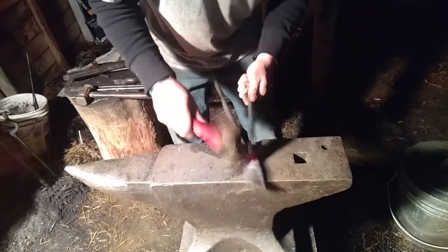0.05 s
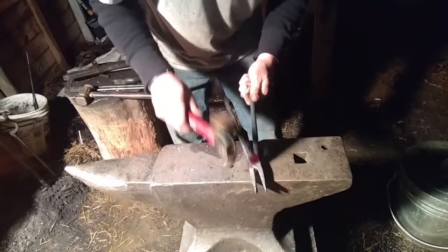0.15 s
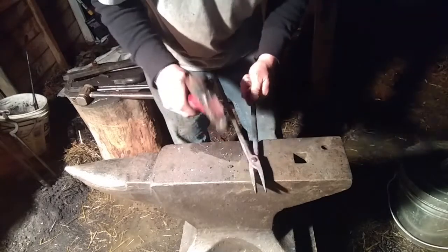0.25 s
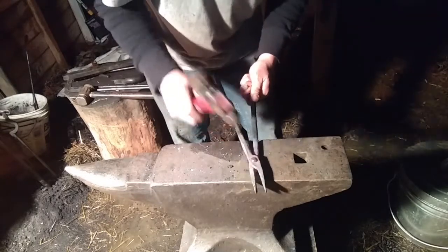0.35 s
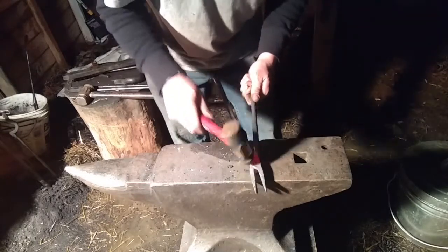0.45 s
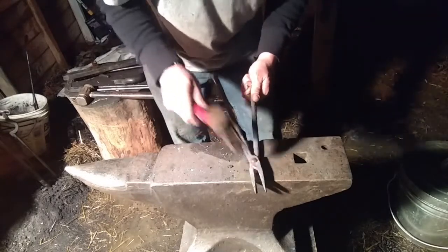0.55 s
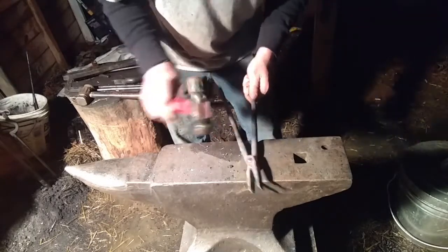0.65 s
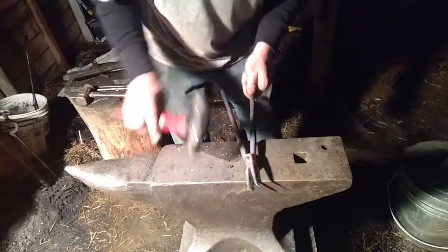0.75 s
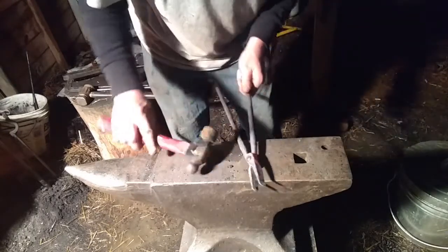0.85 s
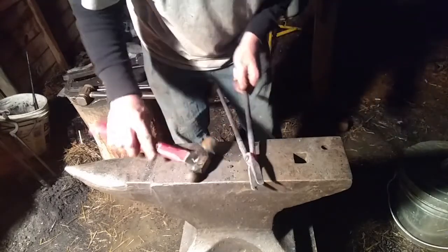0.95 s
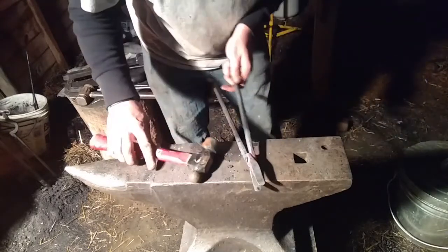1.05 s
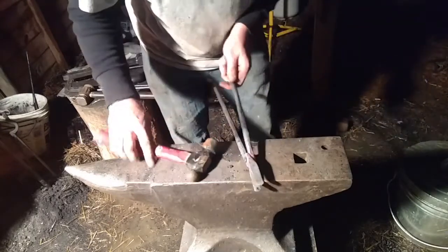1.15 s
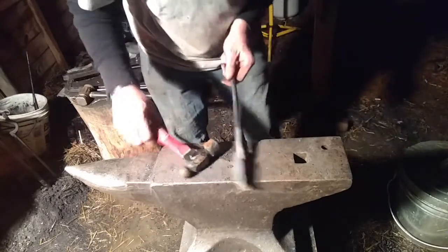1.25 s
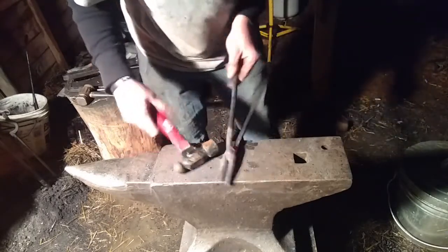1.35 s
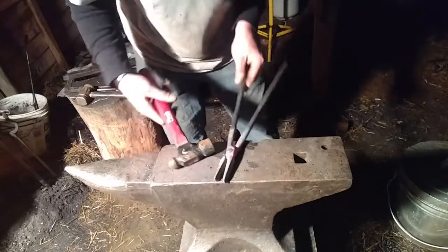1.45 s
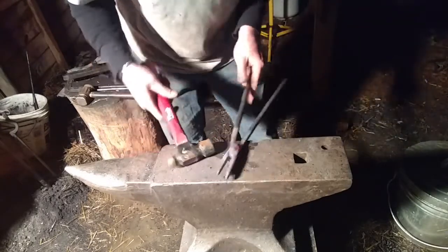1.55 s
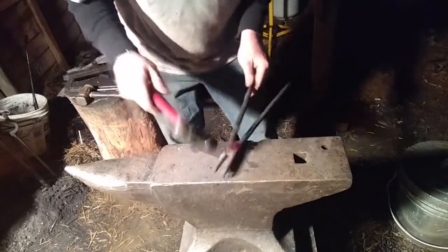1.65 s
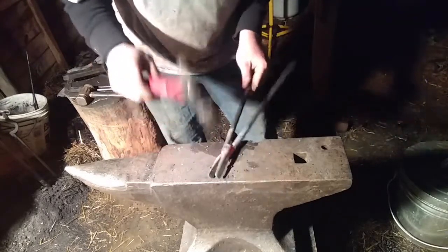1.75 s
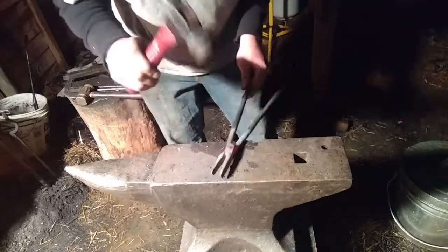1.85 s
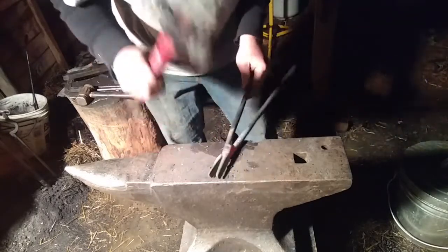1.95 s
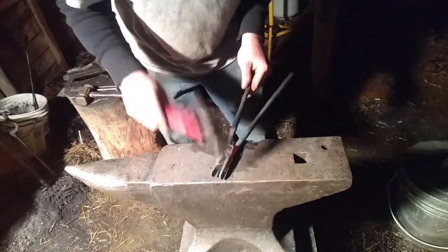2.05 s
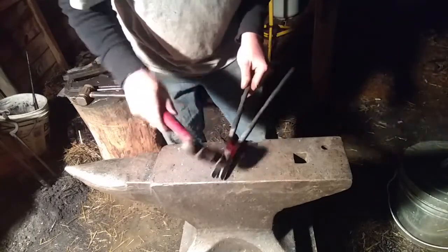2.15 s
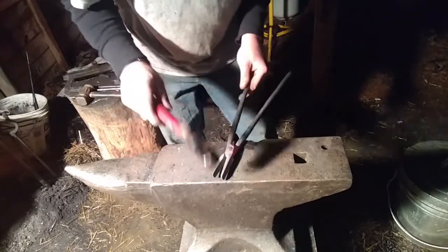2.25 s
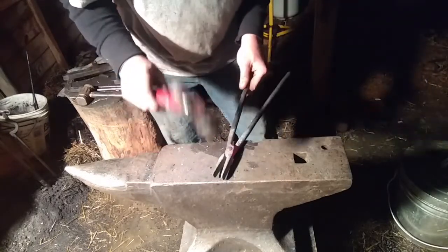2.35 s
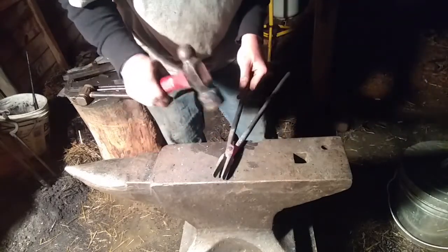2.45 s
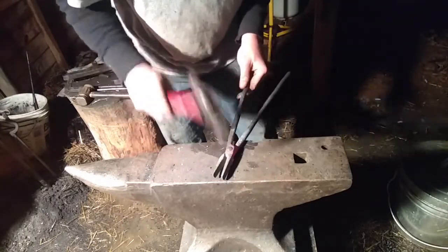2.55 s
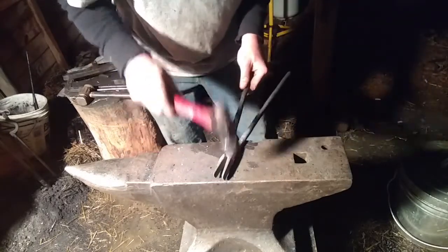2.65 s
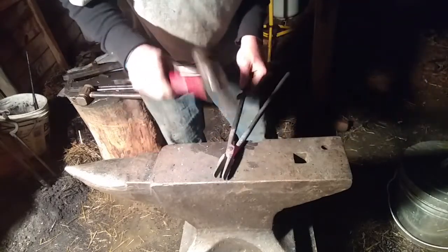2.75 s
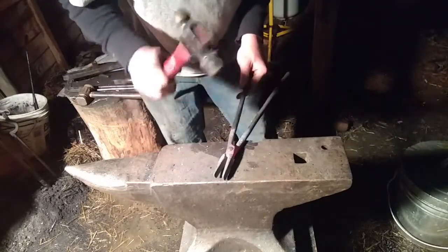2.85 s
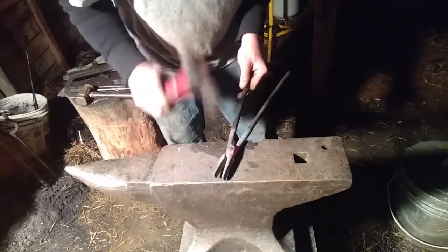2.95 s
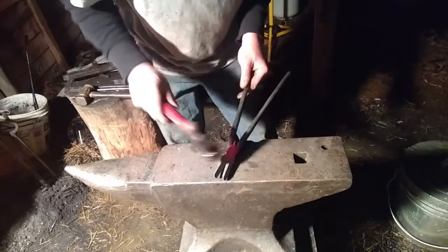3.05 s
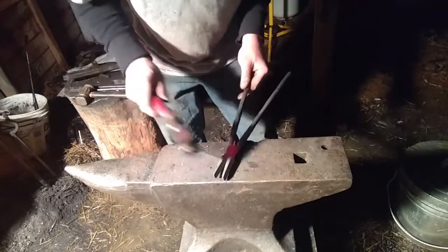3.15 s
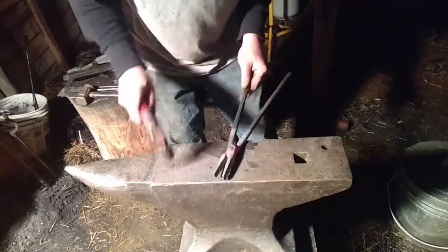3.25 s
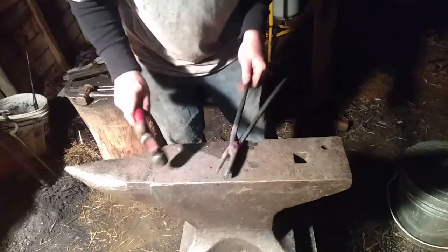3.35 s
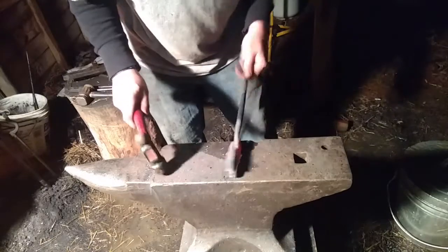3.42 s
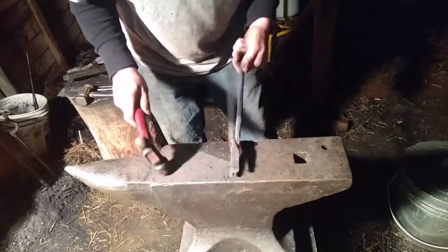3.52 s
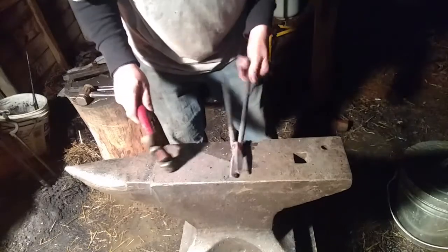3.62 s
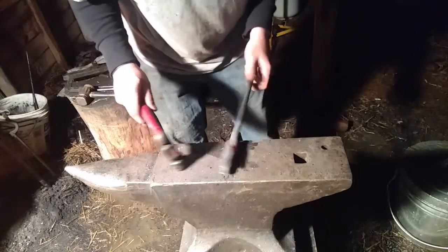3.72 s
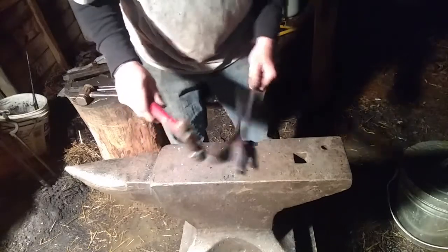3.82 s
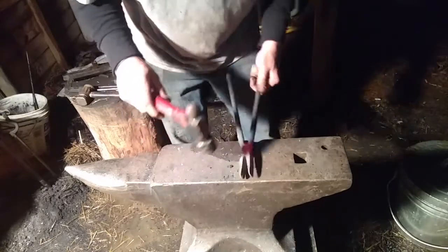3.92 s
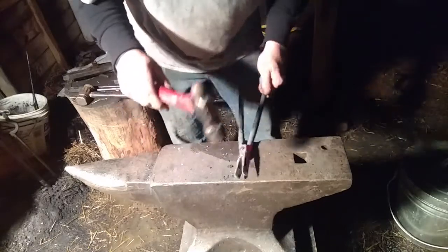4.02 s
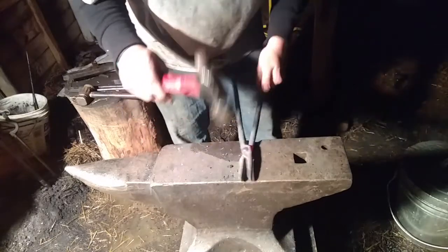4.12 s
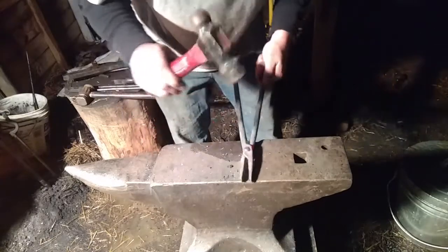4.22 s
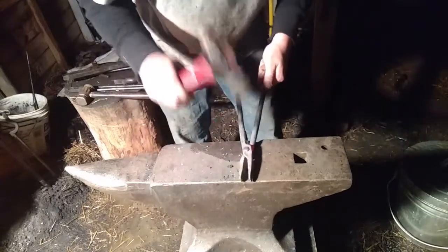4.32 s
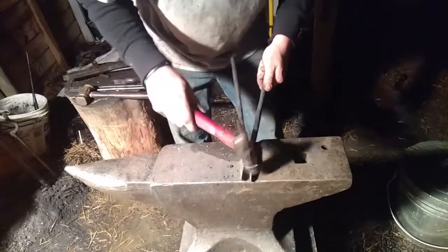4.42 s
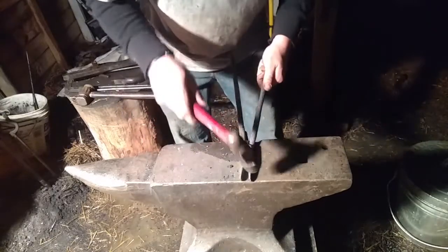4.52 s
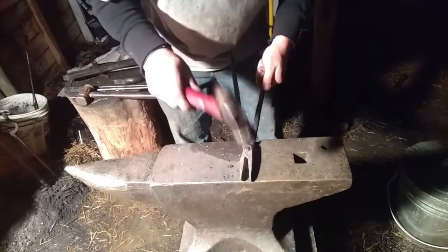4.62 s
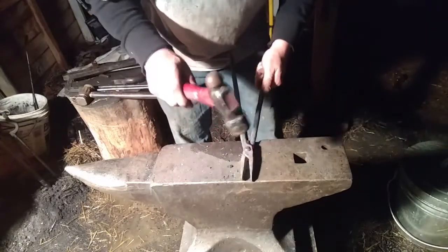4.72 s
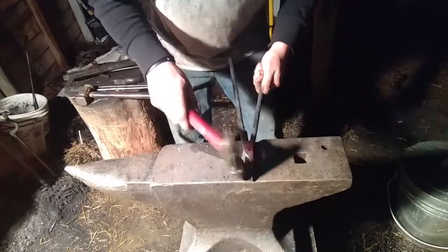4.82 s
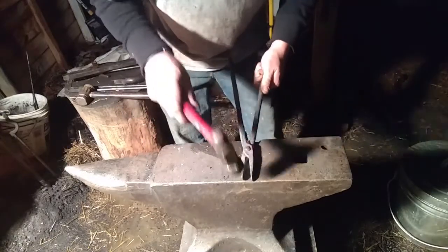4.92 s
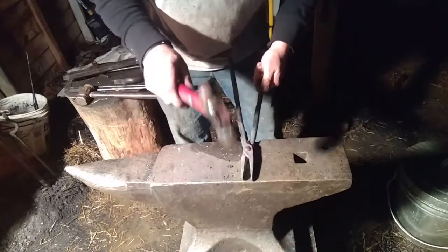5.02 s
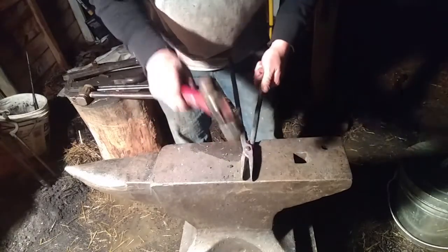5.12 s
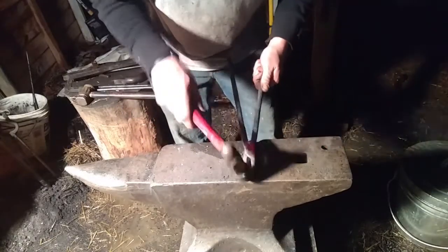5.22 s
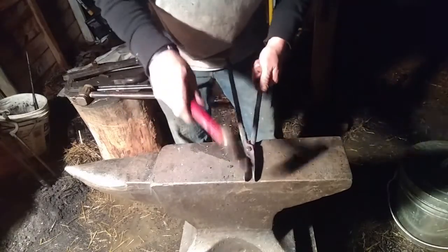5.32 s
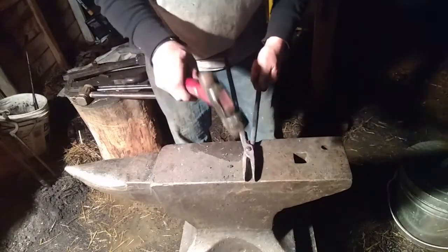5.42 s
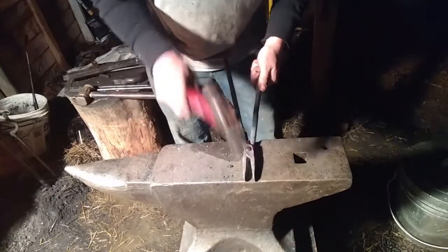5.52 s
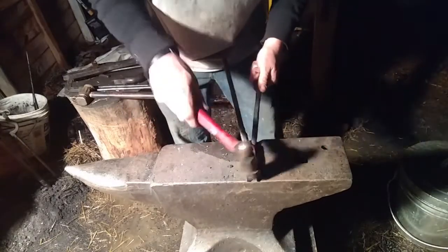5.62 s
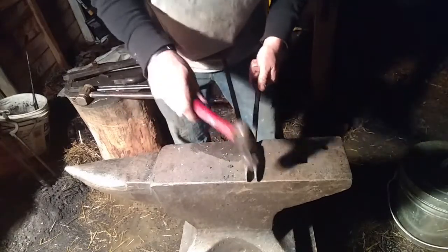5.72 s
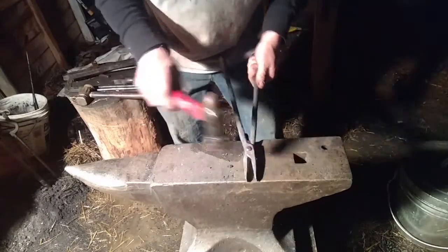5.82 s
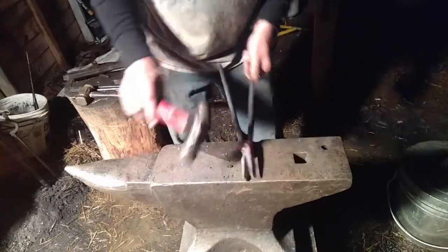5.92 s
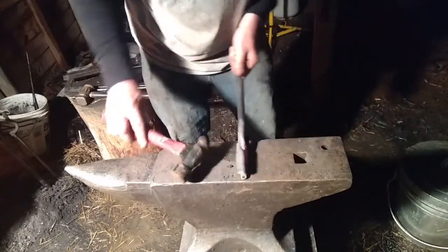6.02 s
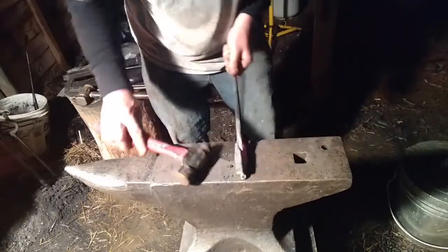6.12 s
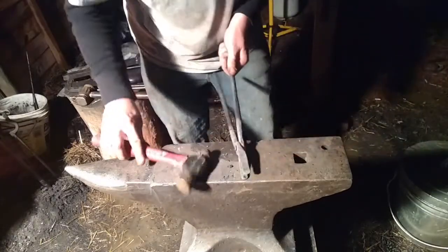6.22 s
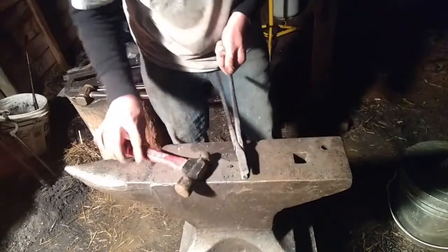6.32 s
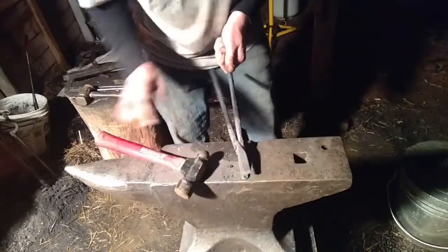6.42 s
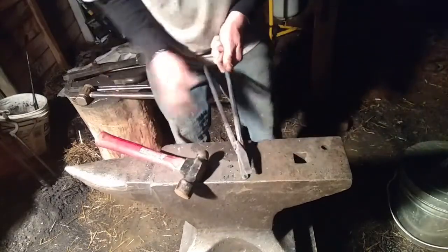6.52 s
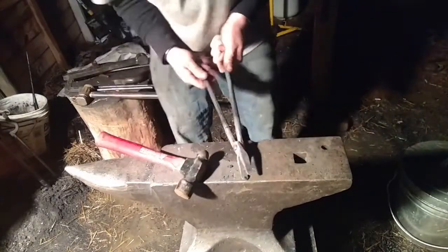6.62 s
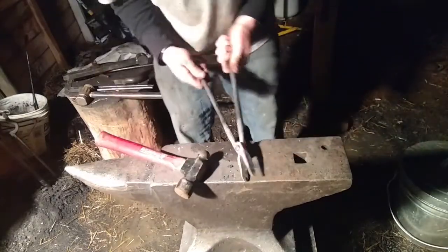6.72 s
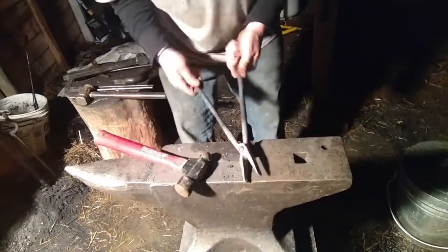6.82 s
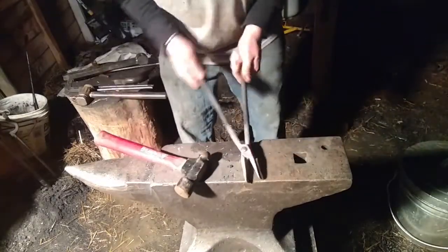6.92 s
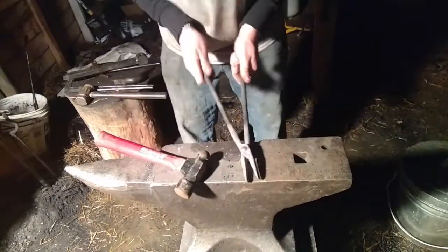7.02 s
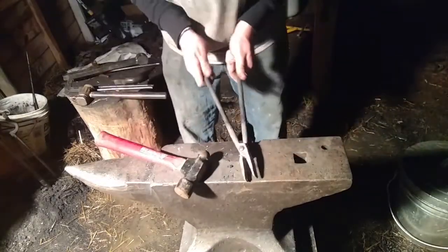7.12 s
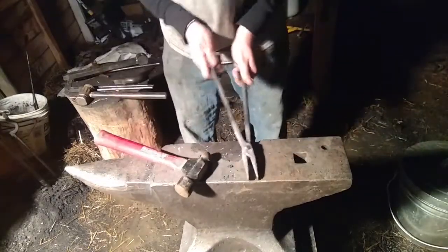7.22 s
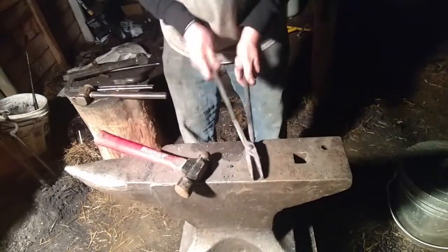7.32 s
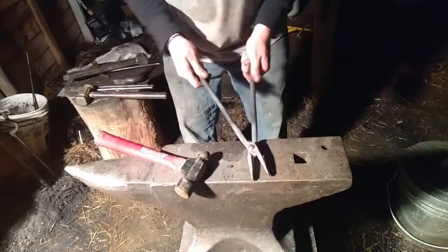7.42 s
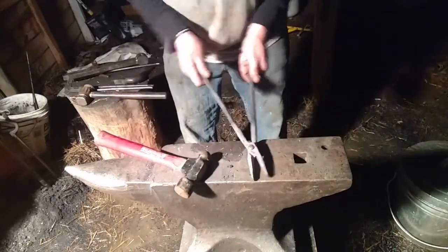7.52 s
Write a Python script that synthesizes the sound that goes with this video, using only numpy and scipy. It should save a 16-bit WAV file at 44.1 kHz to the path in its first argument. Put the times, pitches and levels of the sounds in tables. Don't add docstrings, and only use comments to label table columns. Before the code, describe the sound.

Sharp clanking blows on steel tongs over an anvil, with clattering hammer bounces and small metallic ticks, above a faint airy forge blower.

```python
import sys
import numpy as np
from scipy import signal
from scipy.fft import rfft, irfft, next_fast_len
from scipy.io import wavfile
from scipy.ndimage import uniform_filter1d

SR = 44100
rng = np.random.default_rng(int(sys.argv[2]) if len(sys.argv) > 2 else 0)


def how_loud(loudness_db):
    steps = np.asarray(loudness_db, float) / 20
    return 10 ** steps


def to_wav(sig):
    pcm = np.clip(np.atleast_2d(sig), -1, 1) * 32767
    pcm = np.round(pcm).astype(np.int16)
    wavfile.write(sys.argv[1], SR, pcm.T)


N = 333828


def unit(x):
    return x / np.sqrt(np.mean(x ** 2) + 1e-20)


def along(points, hz):
    f, v = np.transpose(points)
    return np.interp(np.log(hz + 1), np.log(f + 1), v)


def filtered(x, response):
    m = next_fast_len(x.shape[-1] + 1024)
    spectrum = rfft(x, m) * response(np.fft.rfftfreq(m, 1 / SR))
    return irfft(spectrum, m)[..., :x.shape[-1]]


def bump(hz, centre_hz, width_hz):
    return 1 / np.sqrt(1 + (2 * (hz - centre_hz) / width_hz) ** 2)


def ports(pair, alike):
    turn = np.arccos(np.clip(alike, -1, 1)) / 2
    shared, opposed = np.cos(turn) * pair[0], np.sin(turn) * pair[1]
    return np.array([shared + opposed, shared - opposed])


# [t/s, roar level just after/dB]
DUCKS = [(0, -49.5), (.08, -50), (.44, -50), (.82, -56), (2.1, -52.5), (2.61, -51.5), (3.04, -47.5),
         (3.32, -53.5), (4.45, -53), (4.85, -48.5), (5.2, -51.5), (5.58, -51), (6.018, -59)]
RECOVERY_DB_PER_S, DUCK_S = 9.5, 0.023


def automatic_gain_db():
    s, after_db = np.transpose(DUCKS)
    t = np.arange(N) / SR
    last = np.maximum(np.searchsorted(s, t, "right") - 1, 0)
    gain_db = after_db[last] + RECOVERY_DB_PER_S * (t - s[last])
    return uniform_filter1d(gain_db, int(DUCK_S * SR))


# [f/Hz, left minus right/dB]
LEFT_DB = [(60, 6), (180, -12.5), (550, -6.5), (1650, -4), (4970, -2.0), (15000, 3.5)]
# [f/Hz, likeness of the two ports]
ALIKE = [(60, 0.55), (300, 0.51), (1000, 0.56), (2600, 0.93), (15000, 0.96)]


def airflow(colour, patchy_db):
    hz, _, z = signal.stft(rng.standard_normal((2, N)), SR, nperseg=512)
    patches = uniform_filter1d(rng.standard_normal(z.shape[1:]), 5, 0)
    patches = uniform_filter1d(patches, 10, 1)
    z = ports(z, along(ALIKE, hz)[:, None]) * how_loud(patchy_db * unit(patches))
    pair = signal.istft(z, SR, nperseg=512)[1][:, :N]
    side = lambda f: how_loud([along(LEFT_DB, f) / 2, -along(LEFT_DB, f) / 2])
    return unit(filtered(pair, lambda f: colour(f) * side(f)))


def blade_tone(hz, wander_hz):
    drift = unit(uniform_filter1d(rng.standard_normal(N), SR // 30))
    phase = 2 * np.pi * np.cumsum(hz + wander_hz * drift) / SR
    return np.sqrt(2) * np.sin(phase) * how_loud([[-3.5], [1.5]])


# [f/Hz, density/dB per Hz]
ROAR = [(15, -68), (25, -13), (338, -6), (365, -0.5), (410, -15), (470, -6), (594, -5), (1060, -11),
        (1940, -14), (2270, -10.5), (2600, -56), (3380, -57.5), (5720, -120)]
# [f/Hz, density/dB per Hz]
HISS = [(1200, -52), (2500, -0.5), (3600, -7.5), (5400, -3.5), (7000, -5.5), (9000, -10.5), (11000, -17.5),
        (13000, -20.5), (15000, -23), (15600, -58)]
# [f/Hz, width/Hz, level over the roar/dB]
DUCT = [(390.5, 16, 9), (481.6, 2.8, 11), (768, 35, 11), (882, 24, 8), (936, 8.5, 7.5), (1098, 31, 11)]
# [f/Hz, wander/Hz, level against the roar/dB]
WHINE = [(2202, 4.86, -9.5), (2350, 28, -24), (3190, 38, -20), (4680, 45, -20)]
HISS_UNDER_DB = 9.5


def blower():
    roar_db = automatic_gain_db()
    hiss_db = roar_db - HISS_UNDER_DB + 3.5
    resonances = lambda f: 1 + sum((how_loud(db) - 1) * bump(f, c, w) ** 2 for c, w, db in DUCT)
    roar = airflow(lambda f: how_loud(along(ROAR, f)) * resonances(f), patchy_db=1.5)
    whine = sum(how_loud(db) * blade_tone(c, w) for c, w, db in WHINE)
    hiss = airflow(lambda f: how_loud(along(HISS, f)), patchy_db=3.0)
    return how_loud(roar_db) * (roar + whine) + how_loud(hiss_db) * hiss


def ring(modes, t, tilt_db=0, clang_hz=1, since_s=0):
    out = np.zeros(len(t))
    for hz, db, t60_s in modes:
        strength = how_loud(db + tilt_db * np.log2(hz / 3500) + rng.normal(0, 0.18))
        strength = strength * (1 + 0.6 * bump(hz, clang_hz, 270))
        decay = np.exp(-np.log(1000) * t / t60_s)
        out += strength * decay * np.sin(2 * np.pi * hz * (t + since_s))
    return out * (1 - np.exp(-t / 0.00019))


# [f/Hz, t60/s]
CLATTER_T60 = [(200, 0.48), (600, 0.061), (1500, 0.11), (4000, 0.13), (10000, .13), (15000, 0.049)]


def clatter(t, spectrum, body, tilt_db, clang_hz, grainy_db, alike, lasts, clang):
    hz, s, z = signal.stft(rng.standard_normal((2, len(t))), SR, nperseg=128)
    tilted_db = along(spectrum, hz) + tilt_db * np.log2(np.maximum(hz, 1500) / 3500)
    colour = how_loud(tilted_db) * (1 + clang * bump(hz, clang_hz, 830) ** 2)
    colour = colour / np.linalg.norm(colour)
    grains = how_loud(grainy_db * rng.standard_normal(len(s)))
    decay = how_loud(-60 * s / (lasts * along(CLATTER_T60, hz)[:, None]))
    noise = signal.istft(z * colour[:, None] * grains * decay, SR, nperseg=128)[1][:, :len(t)]
    strengths = how_loud(3.5 * rng.standard_normal(len(body)))
    metal = lambda f: 0.72 + sum(g * bump(f, mode[0], 79) ** 2 for g, mode in zip(strengths, body))
    return ports(filtered(noise, metal), alike) * (1 - np.exp(-t / 0.00045))


def contacts(rows, body, spectrum, thump_hz, thump_db, crack_db, clatter_db, body_db, tilt, lasts, clang):
    out, t = np.zeros((2, N + SR)), np.arange(SR // 4) / SR
    late = t - 0.0008
    for s, db, low_db, bright_db, clang_hz, ring_db, *_ in rows:
        tilt_db = tilt * (bright_db + 17.5)
        push = -np.cos(2 * np.pi * thump_hz * late) * np.exp(-(late / 0.00039) ** 2)
        thump = how_loud(low_db + thump_db) * push
        grit = np.diff(rng.standard_normal(len(t) + 1)) * np.minimum(t / 0.0009, 1)
        crack = how_loud(low_db + crack_db - 60 * t / 0.0034) * grit
        tones = how_loud(body_db + ring_db) * ring(body, t, tilt_db, clang_hz)
        loose = clatter(t, spectrum, body, tilt_db, clang_hz, grainy_db=2.0, alike=0.9, lasts=lasts, clang=clang)
        sound = thump + crack + tones + how_loud(clatter_db) * loose
        out[:, round(s * SR):][:, :len(t)] += how_loud(db) * sound
    return out[:, :N]


# [f/Hz, level/dB, t60/s]
ANVIL = [(1446, -6.5, 0.28), (1537.6, 6, 0.18)]
HORN = [(1888, 0, 0.62)]
HEEL = [(1038, -9, 0.35), (2163, 2, .2), (2440, -5.5, 0.4)]
STUMP = [(377.6, -4.5, 0.061), (727, 7.5, 0.057), (820.6, -6, 0.13)]
STUMP_DB, STUMP_GROWS = -25.5, 0.49
FULL_DAMPING_DB, FAINTEST_RING_DB = -33, -57


def anvil(rows):
    out, t = np.zeros(N + SR), np.arange(SR // 2) / SR
    ringing = sorted(row for row in rows if row[6] > FAINTEST_RING_DB)
    for s, *_, db, horn_db, heel_db, shift_db in ringing:
        start = round((s + 0.00052) * SR)
        steel = lambda modes: ring(modes, t, since_s=start / SR)
        stump_db = STUMP_DB + STUMP_GROWS * (db + 19.5) + shift_db - db
        sound = steel(ANVIL) + how_loud(horn_db) * steel(HORN) + how_loud(heel_db) * steel(HEEL)
        sound = sound + how_loud(stump_db + 12.5) * ring(STUMP, t)
        kept = 1 - 0.44 * min(1, how_loud(db - FULL_DAMPING_DB))
        out[start:][:len(t)] *= kept + (1 - kept) * np.exp(-t / 0.004)
        out[start:][:len(t)] += how_loud(db - 12.0) * sound
    return out[:N]


# [t/s, peak/dB, loudest clang f/Hz, anvil ring/dB]
TICKS = [(0.684, -26.5, 1700, -52), (0.6994, -25, 2460, -62), (1.3684, -36.5, 4200, -60),
         (1.484, -36, 1740, -60), (1.5248, -32, 1480, -45), (1.723, -27, 1700, -39),
         (1.8711, -20.5, 1570, -40), (1.9363, -26, 1660, -38), (2.0133, -36.5, 1810, -47),
         (2.0603, -39, 1500, -40), (3.8805, -25.5, 4060, -61), (3.8885, -29.5, 3130, -60),
         (4.0333, -33, 1540, -44), (4.0726, -31, 1540, -48), (4.1593, -27, 4060, -53),
         (6.479, -41, 2220, -57.5)]
TICK_THUMP_DB, TICK_BRIGHT_DB, TICK_HORN_DB, TICK_HEEL_DB = -12, -27, -15, -5
TICK_THINS_DB, TICK_BRIGHTENS_DB = 14, 3
TICK_STUMP_DB = -26


def tick_rows():
    rows = []
    for s, db, hz, body_db in TICKS:
        octaves = np.log2(hz / 1500)
        thump_db = TICK_THUMP_DB - TICK_THINS_DB * octaves
        bright_db = TICK_BRIGHT_DB + TICK_BRIGHTENS_DB * octaves
        rows.append((s, db, thump_db, bright_db, hz, 0, body_db, TICK_HORN_DB, TICK_HEEL_DB, TICK_STUMP_DB))
    return rows


# [f/Hz, level/dB, t60/s]
TONGS = [(2610, -24, 0.05), (3210, -13.5, 0.24), (3550, -24.5, 0.31), (4060, -2, 0.066), (4400, -5, 0.13),
         (4820, -10, 0.066), (5320, -1.5, 0.051), (5915, -5, 0.065), (6080, 3, 0.05), (7180, -1.5, 0.047),
         (9380, -47, 0.044), (12800, -35, .1), (14500, -37, .06)]
# [f/Hz, density/dB per Hz]
CLATTER = [(35, -70), (60, -24), (540, -18), (698, -10.5), (1310, -17.5), (1550, -3), (2300, -18.5),
           (2700, -16), (3500, -17), (11800, -20.5), (14600, -31.5), (16000, -57)]


def shifting_tongs(rows):
    return contacts(rows, TONGS, CLATTER, thump_hz=1700, thump_db=-6, crack_db=-33, clatter_db=7,
                    body_db=-22.0, tilt=0.48, lasts=0.77, clang=3)


ROCK_S, ROCK_DULL_DB = 0.006, -19
SETTLE_DB = 12.5


def bounce_rows(drops, law, ring_db, stump_db):
    bright, body, dulls, fades, horn, heel = law
    gaps = np.diff([row[0] for row in drops], prepend=0, append=N)
    rocks, settles = gaps[:-1] < ROCK_S, SETTLE_DB * (gaps[1:] > 1)
    rows = []
    for (s, db, low_db, hz), rock, settle in zip(drops, rocks, settles):
        bright_db = bright + dulls * db + ROCK_DULL_DB * rock
        body_db = body + fades * db - 60 * rock + settle
        rows.append((s, db, low_db, bright_db, hz, ring_db, body_db,
                     horn - settle, heel - settle, stump_db - settle))
    return rows


# [t/s, peak/dB, thump/dB]
FACE_DROPS = [
    (3.3203, -4.5, 0.5),
    (3.4254, -10.5, -5.5),
    (3.5194, -18.5, -3),
    (3.58, -29, -8),
    (3.6135, -24, -4),
    (3.683, -37.5, 0.5),
]
# [brightness/dB, anvil ring/dB, loss of each/dB per dB weaker (2 columns), horn/dB, heel/dB]
FACE_BOUNCE = (-24.5, -13, 1.45, 1.75, 3, 2)
# [f/Hz, level/dB, t60/s]
HEAD_FACE = [(2770, 13, 0.17), (2980, -14, 0.089), (3500, -2, 0.32), (3160, -24, 0.11), (3640, -12, 0.28),
             (4870, 11.5, 0.094), (5500, -16, .08), (6170, 17, 0.036), (10400, -21, 0.12)]
# [f/Hz, density/dB per Hz]
FACE_CLATTER = [(100, -39), (700, -15), (1500, -10.5), (3300, -13), (6500, -13.5), (8000, -20),
                (10000, -21.5), (12000, -34), (16000, -55)]
FACE_CLANG_HZ = 3300


def face_bounces(rows):
    return contacts(rows, HEAD_FACE, FACE_CLATTER, thump_hz=1700, thump_db=7.0, crack_db=-24, clatter_db=8.5,
                    body_db=-30.5, tilt=0.19, lasts=1.0, clang=0.45)


# [t/s, peak/dB, thump/dB, loudest clang f/Hz]
SIDE_DROPS = [(0.8223, -2, -3.5, 1970), (0.841, -2, -17, 3950), (0.8486, -38, -12, 3550),
              (0.86, -15, -0.5, 3570), (0.9595, -6.5, -22, 2070), (0.9621, -11, -18, 3830),
              (1.0468, -13.5, -11, 3780), (1.0873, -26, -7, 2350), (1.1064, -19.5, -7.5, 3740),
              (1.1421, -22.5, -12, 3400), (6.0168, -1, -8, 4400), (6.0195, -3, -7, 2330),
              (6.1314, -7, -14.5, 3570), (6.135, -12.5, -6.5, 2290), (6.1494, -40, -5, 2270),
              (6.2078, -11, -16.5, 3930), (6.257, -17, -12, 4030), (6.2802, -23, -10, 1500)]
SIDE_BOUNCE = (-12.5, -21, 1.32, 1.1, -3, -17.5)
# [f/Hz, level/dB, t60/s]
HEAD_SIDE = [(2330, 0.5, 0.24), (2780, -2, 0.069), (3450, -18.5, 0.054), (3830, -15, 0.07),
             (4160, -21, 0.049), (4950, 12.5, 0.045), (6070, -12, 0.056), (8870, 3.5, 0.14),
             (8880, 12.5, 0.061), (8300, -27, 0.11), (10600, -9, 0.13), (13350, -8.5, .12),
             (13800, -24, 0.09)]
# [f/Hz, density/dB per Hz]
SIDE_CLATTER = [(100, -68), (700, -8.5), (1500, -17), (2300, -5.5), (4000, -10), (6000, -8.5), (7500, -17),
                (8900, -11), (10500, -23), (11500, -58), (16000, -57)]
SIDE_RING_DB, SIDE_STUMP_DB = -1.5, -14


def side_bounces(rows):
    return contacts(rows, HEAD_SIDE, SIDE_CLATTER, thump_hz=2014, thump_db=6, crack_db=-26, clatter_db=4.5,
                    body_db=-30.5, tilt=0.3, lasts=0.85, clang=1.6)


# [t/s, peak/dB, thump/dB, brightness/dB, anvil ring/dB]
BLOWS = [
    (0.0758, -8, 0, -27, -25.5),
    (0.0931, -3.5, -1, -27.5, -21.5),
    (0.4429, -5, 1, -21.5, -20.5),
    (2.1021, -4, -9, -13, -20.5),
    (2.6086, -3, -13.5, -13, -23.5),
    (3.039, -2.5, -2, -25, -10.5),
    (4.4458, -4.5, -2.5, -7, -37),
    (4.8497, -10, -34, -10, -47),
    (5.2045, -4, 1.5, -17, -15.5),
    (5.5782, -3.5, 3.5, -18, -14.5),
]
# [from t/s, loudest clang f/Hz, tongs ring/dB, horn/dB, heel/dB]
ROUNDS = [
    (0, 3430, 4.5, -0.5, -5),
    (.3, 5915, 6.5, -2.5, -4),
    (1, 5770, -3, -16, -14),
    (2.4, 9380, -3.5, -10.5, -10),
    (2.9, 5760, -13, -16, -10.5),
    (4, 4100, 1, -5, 0),
    (5, 6000, -3.5, -18, -17),
    (5.4, 4500, -1, -12.5, -7),
]


def blow_rows():
    rows = []
    for s, db, low_db, bright_db, body_db in BLOWS:
        _, clang_hz, ring_db, horn_db, heel_db = [row for row in ROUNDS if row[0] <= s][-1]
        rows.append((s, db, low_db, bright_db, clang_hz, ring_db, body_db, horn_db, heel_db, 0))
    return rows


def rivet_blows(rows):
    return contacts(rows, TONGS, CLATTER, thump_hz=1500, thump_db=2.0, crack_db=-43, clatter_db=6.5,
                    body_db=-24.5, tilt=0.4, lasts=1.045, clang=1.2)


def hammering():
    struck, shifted = blow_rows(), tick_rows()
    on_side = bounce_rows(SIDE_DROPS, SIDE_BOUNCE, SIDE_RING_DB, SIDE_STUMP_DB)
    on_face = bounce_rows([(*row, FACE_CLANG_HZ) for row in FACE_DROPS], FACE_BOUNCE, 0, 0)
    hits = rivet_blows(struck) + side_bounces(on_side) + face_bounces(on_face) + shifting_tongs(shifted)
    return (hits + anvil(struck + on_side + on_face + shifted)) * how_loud([[-0.7], [0.7]])


# [f/Hz, step/Hz]
PORT_HZ = (1250, 2590)
# [f/Hz, width/Hz, level/dB]
CAPSULE = [(2400, 790, 4), (5250, 800, 5)]


def spaced(x):
    turns = lambda hz: (hz - PORT_HZ[0]) / PORT_HZ[1]
    lag = lambda hz: np.pi * np.maximum(turns(hz), 0.13 * turns(hz)) - 1.33 * bump(hz, 0, 380) ** 2
    housing = lambda hz: 1 + sum((how_loud(db) - 1) * bump(hz, c, w) ** 2 for c, w, db in CAPSULE)
    return filtered(x, lambda hz: housing(hz) * np.exp(1j * np.array([-lag(hz), lag(hz)])))


def scene():
    return spaced(hammering() + blower())


def roll_off(x):
    return signal.sosfilt(signal.butter(12, 16540, fs=SR, output="sos"), x)


def record(dry):
    bass_cut = lambda hz: (1j * hz / (1j * hz + 90)) ** 2
    band_limit = lambda hz: how_loud(-np.clip(hz - 14500, 0, None) ** 2 / 150000)
    x = filtered(dry, lambda hz: bass_cut(hz) * band_limit(hz))
    x = x / (1 + np.abs(x / 1.1) ** 6) ** (1 / 6)
    return roll_off(x)


dry = scene()
out = record(dry)
to_wav(out)
```